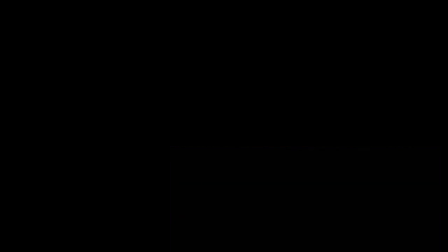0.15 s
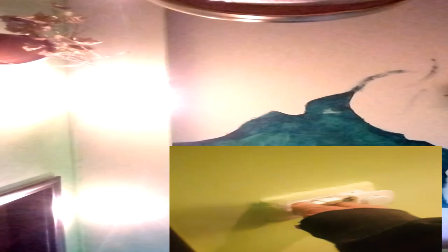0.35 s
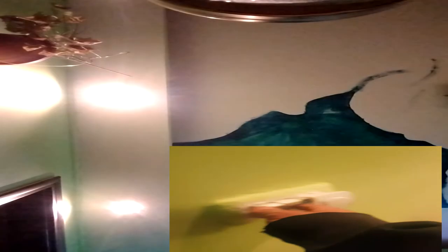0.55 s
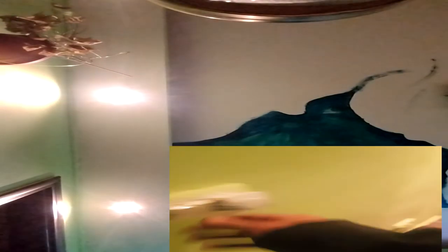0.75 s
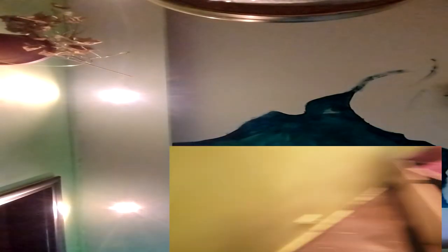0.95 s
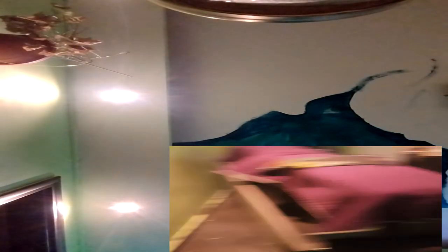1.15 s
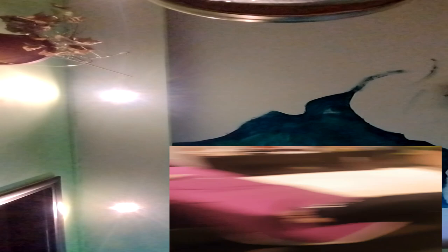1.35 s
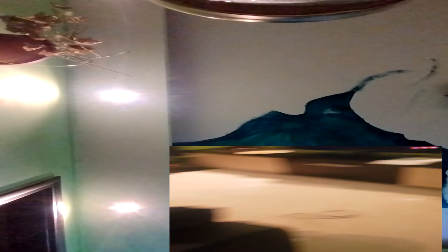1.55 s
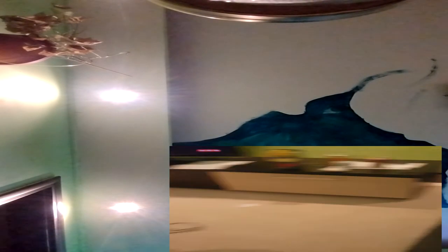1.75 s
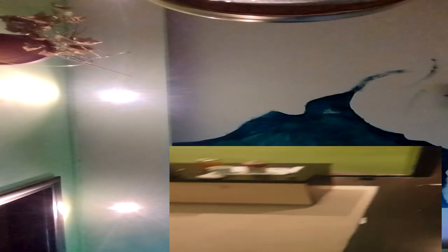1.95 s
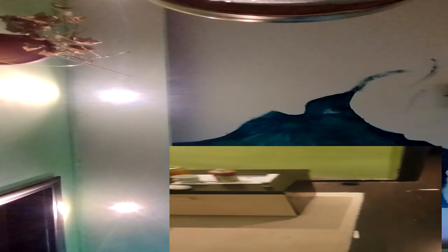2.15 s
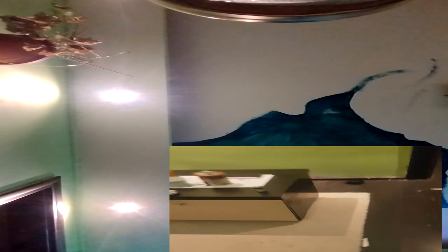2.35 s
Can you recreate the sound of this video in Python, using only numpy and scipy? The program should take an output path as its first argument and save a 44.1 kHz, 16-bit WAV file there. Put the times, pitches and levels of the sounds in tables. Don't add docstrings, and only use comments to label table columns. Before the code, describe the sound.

One bright, crisp wall switch click in a quiet furnished room, preceded by a tiny fingernail tick. Afterwards soft bassy air buffeting, mostly left, as the microphone swings, then quiet sole scuffs and foot knocks.

```python
import sys
import numpy as np
from scipy import signal
from scipy.fft import rfft, irfft, next_fast_len
from scipy.io import wavfile
from scipy.ndimage import map_coordinates

SR = 44100
rng = np.random.default_rng(int(sys.argv[2]) if len(sys.argv) > 2 else 0)


def store_pcm(level_fs):
    pcm = np.round(np.clip(level_fs, -1, 1) * 32767).astype(np.int16)
    wavfile.write(sys.argv[1], SR, np.atleast_2d(pcm).T)


def voltage_ratio(level):
    return 10 ** (np.asarray(level, float) / 20)


N = 105840


def unit(x):
    return x / np.sqrt(np.mean(x ** 2) + 1e-20)


def along(points, hz):
    f, v = np.transpose(points)
    return np.interp(np.log(hz + 1), np.log(f + 1), v)


def curves(rows):
    s, *cols = np.transpose(rows)
    return [np.interp(np.arange(N) / SR, s, c) for c in cols]


def sides(pan_db):
    return voltage_ratio(np.array([pan_db / 2, -pan_db / 2]))


def wobble(rate):
    knots = rng.standard_normal((2, int(N * rate / SR) + 4))
    return np.array([map_coordinates(k, [np.arange(N) * rate / SR]) for k in knots])


def filtered(x, response):
    n = x.shape[-1]
    m = next_fast_len(n + 8192)
    return irfft(rfft(x, m) * response(np.fft.rfftfreq(m, 1 / SR)), m)[..., :n]


def related(pair, alike):
    def mix(hz):
        turn = np.arccos(np.clip(along(alike, hz), -1, 1)) / 2
        return np.array([np.cos(turn), np.sin(turn)])
    mid, side = filtered(pair, mix)
    return np.array([mid + side, mid - side])


def rush(spectrum):
    return unit(filtered(rng.standard_normal((2, N)), lambda hz: voltage_ratio(along(spectrum, hz))))


def add(track, s, x):
    part = track[..., round(s * SR):][..., :x.shape[-1]]
    part += x[..., :part.shape[-1]]


def ring(modes, t):
    out = 0
    for hz, db, t60, pan_db in modes:
        fade = voltage_ratio(db - 60 * t / t60) * (1 - np.exp(-2 * hz * t))
        out = out + sides(pan_db)[:, None] * fade * np.sin(2 * np.pi * hz * t)
    return out


def burst(t, db, t60, colour):
    shared = rng.standard_normal(len(t))
    scattered = 0.9 * rng.standard_normal((2, len(t)))
    return voltage_ratio(db - 60 * t / t60) * unit(filtered(shared + scattered, colour))


CONTACT_S = [
    .2251,
    .2256,
    .2279,
    .2284,
    .2304,
    .2322,
    .2345,
    .2400,
]
# metal_ping_db, plastic_body_db
CONTACTS = [(-18.5, -40), (-26, -46.5), (-20.5, -21), (-25.5, -14), (-29.5, -29.5), (-21, -26.5),
            (-34, -23.5), (-29, -28)]
# pitch_hz, level_db, fade_t60_s, left_minus_right_db
SPRING = [(7340, -19, 0.0065, -6.5), (9210, -7, 0.009, 6.5), (10140, -2.5, 0.0082, -6.5),
          (12240, -8.5, 0.0074, 11), (15130, -13, .005, 13.5), (9600, -9.5, .008, 5)]
# pitch_hz, level_db, fade_t60_s, left_minus_right_db
PLATE = [(515, -20.5, 0.052, 7), (615.5, -10, .06, -8.5), (1170, -16.5, 0.036, 3),
         (1560, -7.5, 0.014, -2.5), (1842, -6, 0.016, 2), (1960, -6.5, 0.004, 9), (2580, -15, 0.024, -1),
         (3620, -5, 0.018, -1), (3800, -12, 0.017, 12)]
# pitch_hz, level_db, fade_t60_s, left_minus_right_db
LINGER = [(1930, -53, .55, 6), (3850, -56, .55, 8), (4050, -58, .5, -6)]
# pitch_hz, level_db (per Hz)
PLASTIC = [(400, -20), (590, -6.5), (1100, -16), (1900, 0.5), (2800, -8), (3800, -2.5), (5500, -5.5),
           (16000, -5)]


def switch():
    out, t = np.zeros((2, N)), np.arange(SR // 10) / SR
    lag_s = 0.0003925

    def bright(hz):
        return hz ** 3 / (hz ** 3 + 6500 ** 3) / (1 + (hz / 13500) ** 4)

    for s, (ping_db, body_db) in zip(CONTACT_S, CONTACTS):
        steel = ring(SPRING, t) + burst(t, 1, 0.0045, bright)
        plastic = ring(PLATE, t) + burst(t, -7, 0.02, lambda hz: voltage_ratio(along(PLASTIC, hz)))
        add(out, s, voltage_ratio(ping_db) * steel + voltage_ratio(body_db) * plastic)
    add(out, CONTACT_S[3], ring(LINGER, np.arange(SR // 2) / SR))

    def to_ports(hz):
        no_push = (1j * hz / (1j * hz + 420)) ** 2
        return no_push * np.exp(-2j * np.pi * hz * np.array([[0], [lag_s]]))
    return filtered(out, to_ports)


def taps(rows, width, rough):
    out, t = np.zeros((2, N)), np.arange(SR // 10) / SR
    for s, db, hz, t60 in rows:
        around = lambda f: np.exp(-(np.log((f + 1) / hz) / width) ** 2)
        puff = unit(filtered(rng.standard_normal((2, len(t))), around))
        fade = voltage_ratio(db - 60 * t / t60) * (1 - np.exp(-t * hz * 4))
        add(out, s, fade * (np.sin(2 * np.pi * hz * t) + rough * puff))
    return out


# start_s, level_db, pitch_hz, fade_t60_s
TICKS = [
    (.112, -44, 10380, 0.002),
    (.1125, -65.5, 1830, .02),
    (.801, -59, 1710, 0.011),
    (.868, -65, 1557, 0.016),
    (1.203, -64.5, 2300, 0.016),
    (1.268, -69, 1780, 0.016),
]


def ticks():
    return taps(TICKS, 0.45, 0.93)


# start_s, level_db, pitch_hz, fade_t60_s
RELEASE = [(.492, -60, 3200, 0.035), (.492, -60, 520, .03), (.492, -64, 4800, .02), (.492, -65, 2000, .02)]


def release():
    return taps(RELEASE, 0.35, 0.55)


# pitch_hz, level_db (per Hz)
WALLS = [(300, -13), (590, 2.5), (1000, -10.5), (1900, 0), (2900, -2.5), (3700, 2), (5500, -8.5),
         (16000, -7.5)]


def blow(s):
    click = 1.0 * (np.arange(N) == round(s * SR))
    x = filtered(click, lambda hz: voltage_ratio(along(WALLS, hz)))
    return x / np.linalg.norm(x)


# pitch_hz, fade_t60_s
ROOM = [(150, 1), (500, 0.27), (1100, 0.31), (2000, 0.42), (2900, 0.27), (3800, 0.32), (8000, 0.3),
        (15000, 0.19)]
# pitch_hz, likeness (-1 to 1)
ROOM_ALIKE = [(100, 1), (300, 0.87), (640, -0.16), (1400, -0.14), (3000, -0.034)]


def room(x, db):
    build_s, delay_s = 0.008, 0.009
    hz, t, z = signal.stft(rng.standard_normal((2, SR // 2)), SR, nperseg=256)
    fade = (1 - np.exp(-t / build_s)) * voltage_ratio(-60 * t / along(ROOM, hz)[:, None])
    tail = related(signal.istft(z * fade, SR, nperseg=256)[1], ROOM_ALIKE)
    late = np.pad(x, (round(delay_s * SR), 0))[None]
    return voltage_ratio(db) * signal.fftconvolve(late, tail / np.linalg.norm(tail[0]), axes=1)[:, :N]


# start_s, hiss_level_db, left_minus_right_db
SLIDE = [(1.62, -75.5, -1), (1.7, -64, 6), (1.81, -62.5, 4), (1.86, -61.5, 11), (1.902, -62, 12),
         (1.92, -67, 2), (1.96, -72, 0), (2.058, -72, -3), (2.09, -61, -7.5), (2.136, -52.5, -5.5),
         (2.17, -68, -3), (2.22, -78.5, -6), (2.31, -65.5, -5.5), (2.352, -70, -4), (2.368, -50.5, 0),
         (2.4, -58, 4)]
# start_s, level_db
WEIGHT = [(1.8, -74), (1.901, -70.5), (1.918, -57), (1.98, -58.5), (2.06, -66.5), (2.09, -58),
          (2.135, -51.5), (2.17, -58), (2.203, -56), (2.22, -57), (2.299, -63.5), (2.35, -64), (2.374, -59),
          (2.4, -54)]
# pitch_hz, level_db (per Hz)
SOLE = [(4000, -19), (6000, -14), (6700, -6.5), (8000, -6), (8600, -3.5), (11500, -1), (13000, -2.5),
        (16000, -14)]
# pitch_hz, level_db (per Hz)
SCUFF = [(3000, -7.5), (6300, 4), (13000, -15), (16000, 0.5)]
# pitch_hz, level_db (per Hz)
DRAG = [(150, -5.5), (400, 0), (800, -5), (2300, -16), (3000, -25), (12000, -27.5)]
# start_s, level_db, pitch_hz, fade_t60_s
KNOCKS = [(1.865, -55, 600, 0.022), (1.912, -50.5, 520, 0.034), (1.913, -54, 1510, 0.021),
          (2.089, -41.5, 309, 0.041), (2.098, -56, 1210, .02), (2.113, -57, 2010, 0.028),
          (2.1205, -36.5, 338, 0.032), (2.123, -51, 1160, 0.013), (2.162, -57, 300, 0.024),
          (2.266, -77, 497, 0.014), (2.128, -48, 2160, 0.0069), (2.369, -47, 400, 0.027),
          (2.3755, -39.5, 534, 0.017), (2.388, -41, 388, 0.017)]
# start_s, level_db, pitch_hz, fade_t60_s
HEEL = [
    (2.1352, -34, 400, .016),
    (2.1358, -39, 2200, .008),
    (2.1358, -41, 9000, .004),
    (2.2088, -41, 2100, .005),
    (2.2088, -41, 900, .009),
    (2.212, -41, 380, .018),
    (2.3565, -38, 520, .008),
]


def slipper():
    slide_db, pan_db = curves([(1.55, -110, 0.0063)] + list(SLIDE))
    weight_db, = curves([(1.7, -110)] + WEIGHT)
    hiss = voltage_ratio(slide_db + 1.9 * wobble(330)) * sides(pan_db - 3.5) * rush(SOLE)
    scuff_db = -69 + 2.3 * (slide_db + 57.5) + 2.5 * wobble(200)[0]
    scuff = voltage_ratio(scuff_db) * rush(SCUFF)
    drag = voltage_ratio(weight_db + 0.68 * wobble(90)[0]) * related(rush(DRAG), ROOM_ALIKE)
    knocks = taps(KNOCKS, 0.61, 0.5) + taps(HEEL, 0.5, 0.2)
    return hiss + scuff + drag + knocks + room(knocks.mean(axis=0), -12)


def eddies(rows):
    cycles, skew_rad = 0.72, 0.7
    t, thump, swell = np.arange(N) / SR, 0, 0
    for (s, db, hz), turn in zip(rows, rng.uniform(-skew_rad, skew_rad, (40, 1))):
        bell = voltage_ratio(db) * np.exp(-((t - s) * hz / cycles) ** 2 / 2)
        thump = thump + bell * np.cos(2 * np.pi * hz * (t - s) + turn)
        swell = swell + bell
    return thump, swell


# start_s (of the peak), level_db, pitch_hz
EDDIES_LEFT = [(0.882, -36, 67), (0.983, -33.5, 68), (1.04, -32, 104), (1.0905, -18, 95.6),
               (1.117, -29, 185), (1.167, -32, 78.4), (1.194, -59, 75.4), (1.224, -28.5, 79),
               (1.275, -30, 111), (1.313, -45, 64.5), (1.358, -37, 88.4), (1.394, -31.5, 69),
               (1.462, -28, 66.5), (1.541, -42, 55.7), (1.581, -33.5, 77), (1.618, -29.5, 76),
               (1.688, -44, 83.1), (1.713, -34, 98.5), (1.745, -28.5, 56), (1.77, -28.5, 60),
               (1.806, -25.5, 72.3), (1.99, -36.5, 74), (2.043, -39.5, 86.4), (2.09, -38, 139),
               (2.136, -41.5, 92), (.96, -44, 237), (1.088, -37.5, 370), (1.119, -32, 264),
               (1.155, -34.5, 209), (1.216, -40, 255), (1.25, -32, 170)]
# start_s (of the peak), level_db, pitch_hz
EDDIES_RIGHT = [(0.858, -41.5, 63.6), (0.964, -39, 146), (1.296, -44, 49), (1.378, -39, 78),
                (1.403, -45, 60.6), (1.441, -35, 65.6), (1.739, -31, 78), (1.77, -40, 82),
                (1.812, -49, 61.4), (1.865, -32.5, 70.4), (1.911, -29.6, 93.5), (1.955, -38, 122),
                (1.992, -58, 70.6), (2.05, -57, 78.5), (2.103, -58, 99), (2.138, -38, 172),
                (2.165, -45.5, 202), (2.19, -51, 171), (2.305, -52.5, 170), (2.322, -54, 189)]
# start_s (of the peak), level_db, pitch_hz
WISPS = [(1.013, -53, 404), (1.07, -49, 545), (1.33, -51, 323), (1.762, -61, 317)]
# start_s, level_db, left_minus_right_db
AIRFLOW = [(0, -91, 5.5), (.55, -64.5, 2.5), (.61, -60, 22), (.7, -66, 0.5), (.84, -64, 4.5),
           (1.0, -49, 15), (1.15, -46, 27.5), (1.3, -52, 19), (1.45, -53, 9), (1.505, -62, 6),
           (1.6, -48, 14), (1.67, -63.5, 14), (1.76, -54, 2), (1.9, -46, -11), (2.2, -60.5, -6),
           (2.4, -60, 7)]
# pitch_hz, level_db (per Hz)
TURBULENCE = [(15, -21), (40, 4.5), (80, 2), (140, -8.5), (250, -20), (500, -46), (1000, -57), (2000, -83)]


def air():
    flow_db, pan_db = curves(AIRFLOW)
    left, right = eddies(EDDIES_LEFT + WISPS), eddies(EDDIES_RIGHT)
    thump, swell = np.transpose([left, right], (1, 0, 2))
    rumble = voltage_ratio(flow_db + 2.5 * wobble(22)) * sides(pan_db) * rush(TURBULENCE)
    flutter = voltage_ratio(-15.5) * swell * rush([(hz * 1.48, db) for hz, db in TURBULENCE])
    return rumble + filtered(thump, lambda hz: hz ** 2 / (hz ** 2 + 25 ** 2)) + flutter


def lamp():
    on_s = np.arange(N) / SR - CONTACT_S[0]
    level = voltage_ratio(-63.5 - 60 * on_s / 6 + 1.5 * wobble(7.1)[0])
    return (on_s > 0) * level * np.sin(2 * np.pi * 99 * on_s)


# pitch_hz, level_db (per Hz)
HUM = [(60, -12), (130, -12), (300, -16.5), (1000, -30), (6800, -42), (9000, -38.5), (12000, -32.5),
       (16000, -33.5)]
# pitch_hz, likeness (0 to 1)
HUM_ALIKE = [(60, 0.77), (130, 0.2), (290, 1), (640, 0), (1400, 0.0088)]
# start_s, level_db
HUM_SWELL = [(.6, -1), (1.1, 2.5), (2.4, -1.5)]


def hum():
    swell_db, = curves(HUM_SWELL)
    return voltage_ratio(-65 + swell_db) * related(rush([(30, -18.5)] + list(HUM)), HUM_ALIKE)


def scene():
    nail = ticks()
    answer = room(blow(CONTACT_S[2]) + nail.mean(axis=0), -4.5)
    return switch() + release() + nail + answer + slipper() + air() + lamp() + hum()


def band_limit(x):
    return signal.sosfilt(signal.butter(12, 16650, fs=SR, output="sos"), x)


# pitch_hz, left_minus_right_db
PORTS = [(5500, 0), (7600, -10), (8300, 1), (9200, 11), (11000, 5), (12500, 2), (16000, 1)]


def record(dry):
    def ports(hz):
        share = np.array([[0.7], [-0.3]])
        steep_end_db = np.clip(hz - 15900, 0, 2000) / 20
        return voltage_ratio(share * along(PORTS, hz) - steep_end_db)
    return band_limit(filtered(dry, ports))


dry = scene()
out = record(dry)
store_pcm(out)
```